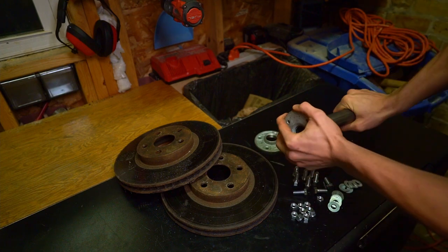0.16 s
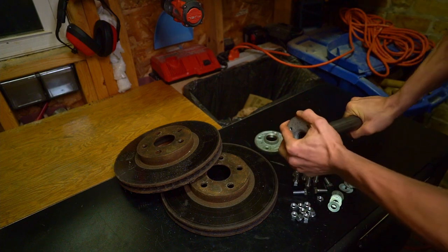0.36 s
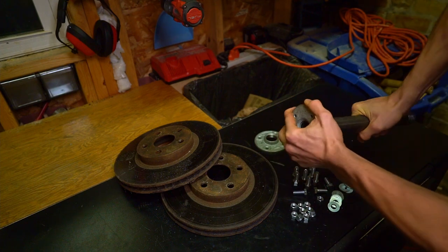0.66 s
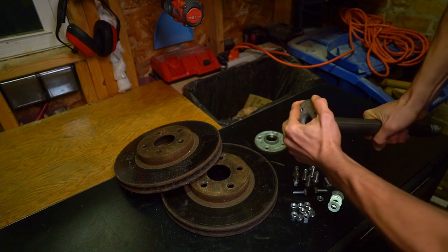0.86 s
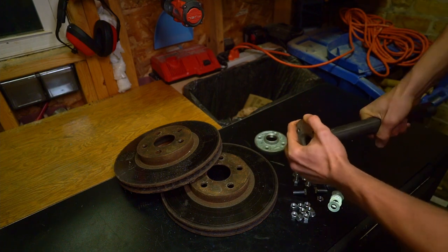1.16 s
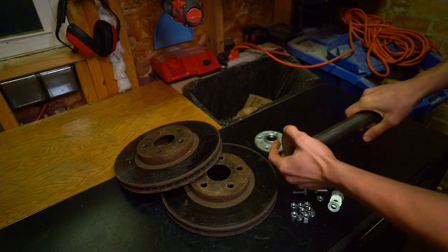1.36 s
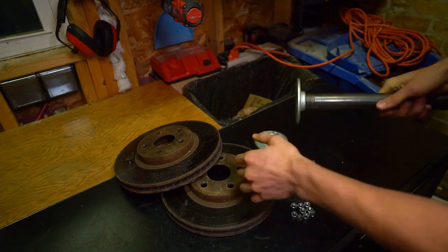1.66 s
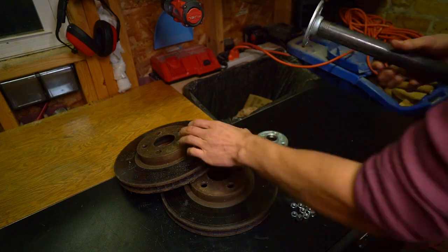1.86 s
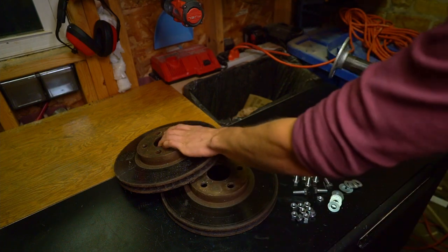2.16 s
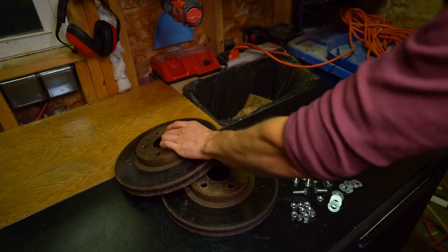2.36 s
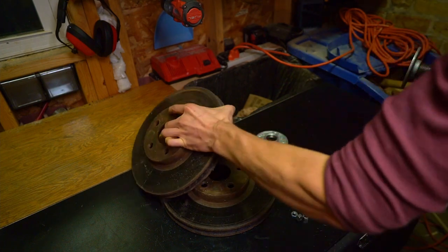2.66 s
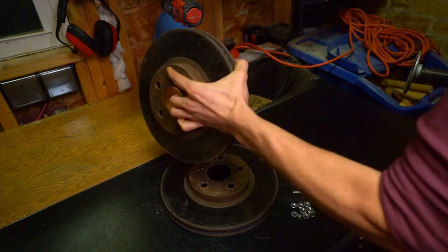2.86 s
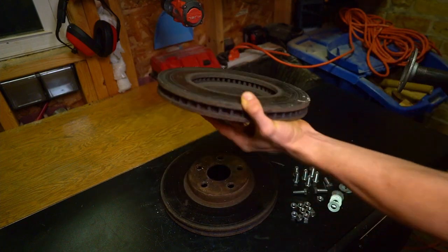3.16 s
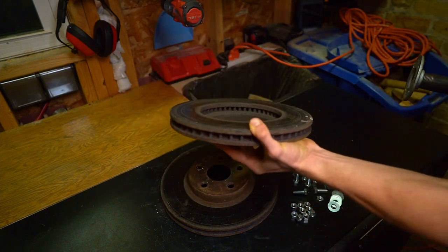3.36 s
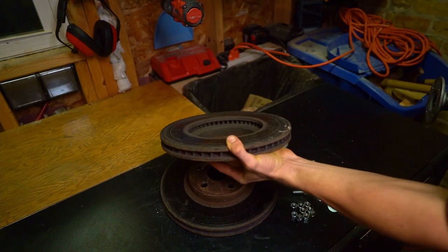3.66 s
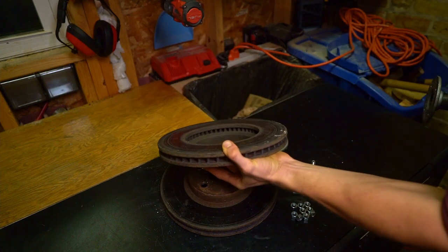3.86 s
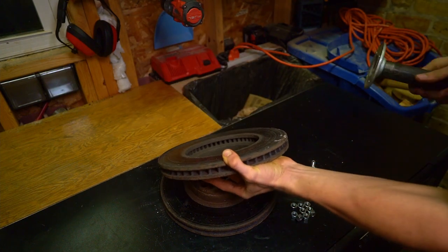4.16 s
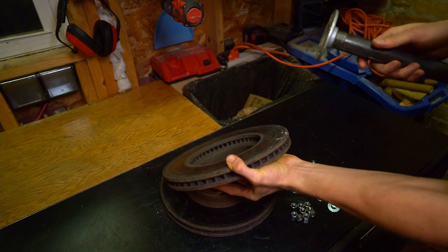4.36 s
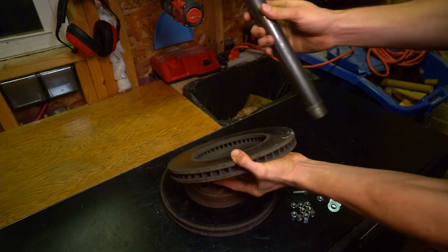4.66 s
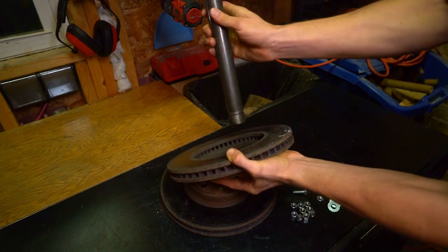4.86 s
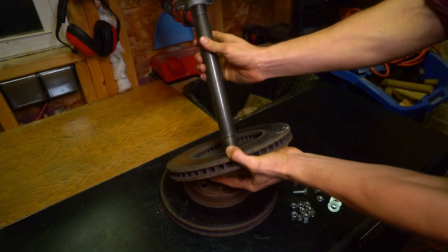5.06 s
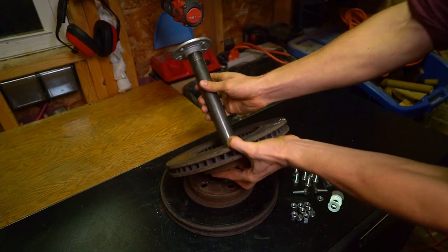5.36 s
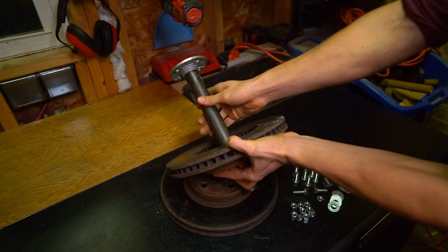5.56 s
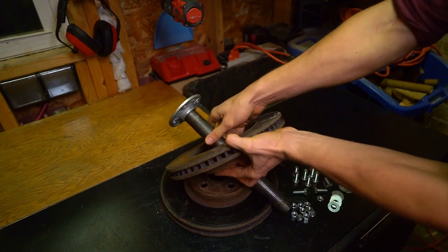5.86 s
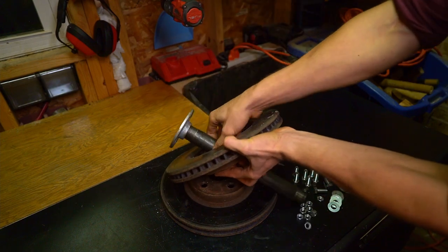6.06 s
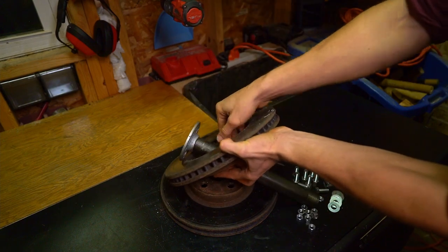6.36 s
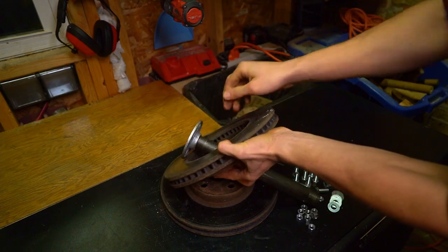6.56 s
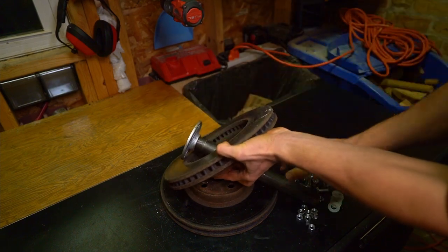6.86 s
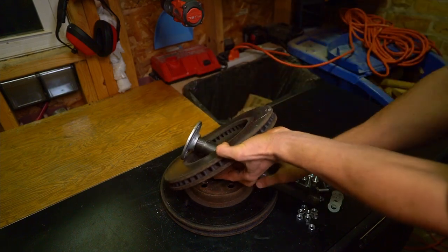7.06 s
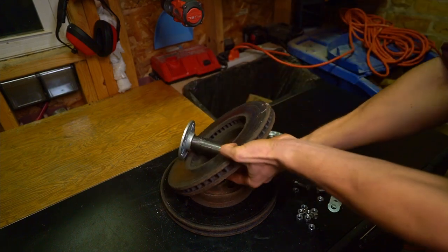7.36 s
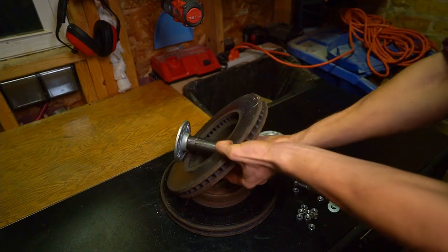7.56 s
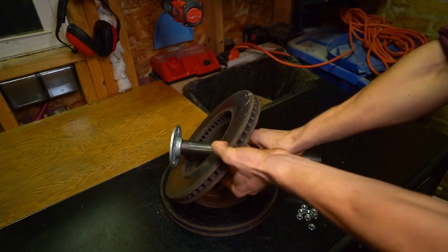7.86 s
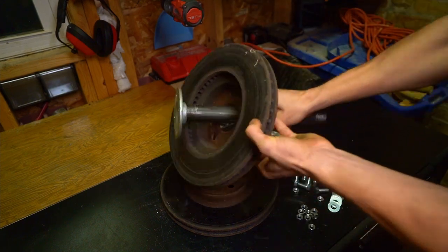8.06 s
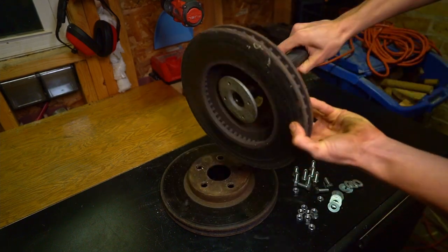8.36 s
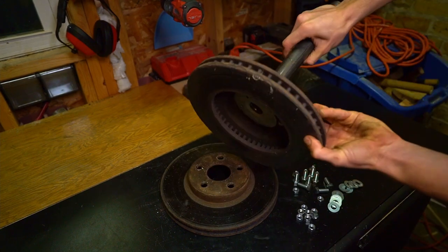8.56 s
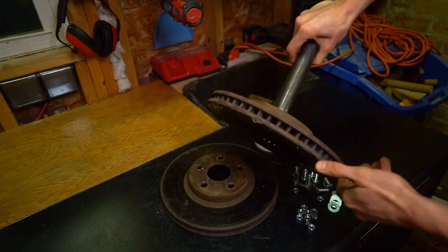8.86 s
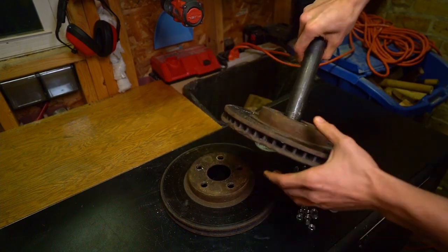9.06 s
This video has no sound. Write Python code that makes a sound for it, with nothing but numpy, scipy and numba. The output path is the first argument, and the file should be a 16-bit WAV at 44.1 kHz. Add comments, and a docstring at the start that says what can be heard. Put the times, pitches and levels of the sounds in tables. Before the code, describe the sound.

Heavy metal parts being fitted together, with ringing clanks, dull bench thuds and short squealing scrapes in a small workshop.

```python
"""A sleeve brushes past and grit ticks in a quiet, humming shed; then a cast brake rotor, a steel pipe
and its flange knock, slide and scrape together over a workbench. Each blow and rub is shared among the
parts, which ring in their own modes. Rubbing steel squeals, air sings in the rotor's hollow, the bench
thuds and rattles. The walls echo briefly; a small recorder squeezes and clips the loudest clanks."""
import sys
import numpy as np
from scipy import signal
from scipy.fft import rfft, irfft
from scipy.io import wavfile
from scipy.ndimage import uniform_filter1d
from numba import njit

SR = 44100
rng = np.random.default_rng(int(sys.argv[2]) if len(sys.argv) > 2 else 0)


def output_pcm(signal):
    """Save a mono or channel-first signal as 16-bit PCM at the path in sys.argv[1].

    Samples are clipped to [-1, 1] before scaling.
    """
    pcm = np.clip(np.atleast_2d(signal).T, -1, 1) * 32767
    wavfile.write(sys.argv[1], SR, np.round(pcm).astype(np.int16))


N = 406602
T = np.arange(N) / SR


def undb(db):
    return 10 ** (np.asarray(db) / 20)


def unit_rms(x):
    return x / np.sqrt(np.mean(x ** 2))


def band(x, hz, octaves):
    """Band-pass around hz, edges capped below Nyquist."""
    edges = np.minimum(hz * 2. ** (octaves * np.array([-.5, .5])), [SR / 2.4, SR / 2.2])
    return signal.sosfilt(signal.butter(2, edges, "bandpass", fs=SR, output="sos"), x)


def impulses(times_s, db):
    """One impulse per event."""
    return np.bincount((np.asarray(times_s) * SR).astype(int), undb(db), N)


def wander(rate_hz):
    """Ramps between random levels; spread near 1."""
    hold = int(SR / rate_hz)
    return 1.3 * uniform_filter1d(np.repeat(rng.standard_normal(N // hold + 1), hold), hold)[:N]


def grit(rate_hz, spread_db, spurt_db=4.0):
    """Micro-impacts of rough surfaces, uneven and in spurts."""
    size = undb(spread_db * np.minimum(rng.exponential(1, N), 5)) * rng.standard_normal(N)
    hits = rng.random(N) < rate_hz / SR
    return unit_rms(size * hits * undb(spurt_db * wander(40)))


def narrow_noise(hz, width_hz):
    """Narrow noise band around a steady or moving pitch."""
    lowpass = signal.butter(2, width_hz / 2, fs=SR, output="sos")
    slow = signal.sosfilt(lowpass, rng.standard_normal((2, N)))
    phase = 2 * np.pi * np.cumsum(hz * np.ones(N)) / SR
    return unit_rms(slow[0] * np.cos(phase) + slow[1] * np.sin(phase))


@njit
def mode(force, turn, loss, damping, rise):
    """One resonance: swells during contact, decays by loss * damping per sample."""
    out, push, state = np.empty(len(force)), 0j, 0j
    for i in range(len(force)):
        push = push * turn * (1 - rise) + rise * force[i]
        state = state * turn * (1 - loss * damping[i]) + push
        out[i] = state.imag
    return out


def ring(pitches_hz, modes, times_s, blow_db, rub=0, damping=1, spread_db=1.5, contact_s=0.0011):
    """A struck and rubbed part; each blow favours other modes at random."""
    mode_db, t60_s = np.transpose(modes)
    loss = np.log(1000) / SR / t60_s
    friction = rub * grit(rate_hz=5000, spread_db=3.0) * np.sqrt(4 * loss[0]) + 1e-18
    scatter_db = spread_db * rng.standard_normal((len(times_s), len(modes)))
    rise = 1 / (1 + contact_s * SR)
    out = np.zeros(N)
    for k, hz in enumerate(pitches_hz):
        force = impulses(times_s, blow_db + scatter_db[:, k]) + friction
        turn = np.exp(2j * np.pi * hz / SR)
        out += undb(mode_db[k]) * mode(force, turn, loss[k], damping * np.ones(N), rise)
    return out


def clatter(bands, times_s, blow_db, rub, octaves):
    """Dense modes as noise bands: they jump at a blow, decay, and are sustained by rubbing."""
    out = np.zeros(N)
    for hz, db, t60_s in bands:
        decay = np.exp(-np.log(1000) / (t60_s * SR))
        fade = signal.lfilter([1], [1, -decay], impulses(times_s, blow_db) + 1e-18)
        noise = band(grit(rate_hz=8000, spread_db=2.5), hz, octaves)
        out += undb(db) * unit_rms(band(noise, hz, 2 * octaves)) * (fade + rub)
    return out


# Room noise spectrum: f/Hz, relative density/dB
SHED_SPECTRUM = [(20, -2), (45, 5), (125, 7.5), (250, -1.5), (500, -5), (1000, -9.5), (2000, -20),
                 (3800, -22.5), (5500, -35.5), (16000, -36.5)]
# Hum partials: f/Hz, level/dB
SHED_HUM = [(96.9, -66), (360.7, -72.5)]


def shed(noise_db=-57.5):
    """Slightly wavering room noise with a faint hum."""
    spectrum_hz, spectrum_db = np.transpose(SHED_SPECTRUM)
    bins_hz = np.maximum(np.arange(N // 2 + 1) * SR / N, 1)
    shape = undb(np.interp(np.log(bins_hz), np.log(spectrum_hz), spectrum_db))
    noise = unit_rms(irfft(rfft(rng.standard_normal(N)) * shape, N))
    hum = sum(np.sqrt(2) * undb(db + 2 * wander(2.5)) * np.sin(2 * np.pi * hz * T) for hz, db in SHED_HUM)
    return undb(noise_db + 0.4 * wander(1.7)) * noise + hum


# Strokes of skin and sleeves: t/s, hold/s, high hiss/dB, low hiss/dB
STROKES = [(0.0, 0.039, -56, -57.5), (.45, 0.41, -98, -86), (1.29, 0.11, -60, -60.5),
           (1.5, 0.14, -77, -69.5), (1.8, 0.6, -73, -71), (2.66, 0.09, -51.5, -53),
           (3.33, 0.028, -81.5, -76), (4.6, 0.045, -80, -89), (5.47, 0.015, -52, -36.5),
           (7.03, .12, -69.5, -68.5), (7.28, .15, -60, -57), (7.66, 0.12, -69.5, -64),
           (8.46, 0.074, -61, -39)]
# High hiss bands: f/Hz, gain/dB
HISS_HIGH = [(6500, -2.5), (9000, 0), (12500, -3), (15200, -7)]
# Low hiss bands: f/Hz, gain/dB
HISS_LOW = [(2000, -3.5), (2900, -1.5), (3900, 3.5), (5000, -12)]


def brush(floor_db=-81.5, rise_s=0.02, fade_s=0.07):
    """Fine hiss of constant rustle, dust under slides, and strokes; rise and fade times per 20 dB."""
    slide_db = slides()[0]
    high = undb(floor_db) + undb(slide_db - 26.5)
    low = undb(floor_db) + undb(slide_db - 19)
    for start_s, hold_s, high_db, low_db in STROKES:
        fading = np.maximum(T - start_s - hold_s, 0) / fade_s
        stroke = undb(-20 * np.maximum(fading, (start_s - T) / rise_s))
        high += undb(high_db) * stroke
        low += undb(low_db) * stroke
    out = np.zeros(N)
    for envelope, bands in (high, HISS_HIGH), (low, HISS_LOW):
        for hz, db in bands:
            grains = grit(rate_hz=26000, spread_db=1.5, spurt_db=4.5)
            out += envelope * undb(db) * unit_rms(band(grains, hz, octaves=0.5))
    return out


# Grit and small hardware: t/s, peak level/dB, centre f/Hz
GRIT_TICKS = [(0.4336, -39.5, 2080), (0.495, -45, 2860), (0.5806, -53, 3280), (0.7084, -51, 1860),
              (0.862, -43, 4190), (0.9493, -47, 2880), (1.264, -40, 2960), (1.3, -34, 3480),
              (3.345, -43, 13900), (3.3694, -58, 3660), (3.4548, -58, 1700), (3.486, -30.5, 3200),
              (3.569, -50.5, 3210), (4.151, -36.5, 6800), (4.2653, -43.5, 2230), (4.3784, -47.5, 1466),
              (8.707, -60, 3028)]


def ticks(t60_s=0.011, octaves=1.52):
    """Dry snaps of grit and hardware: short band-passed noise bursts."""
    out, t = np.zeros(N), np.arange(2048) / SR
    for start_s, db, hz in GRIT_TICKS:
        burst = rng.standard_normal(len(t)) * 1000 ** (-t / t60_s)
        snap = band(band(burst, hz, octaves), hz, 2 * octaves)
        i = int(start_s * SR)
        out[i:i + len(t)] += undb(db) * snap / np.abs(snap).max()
    return out


# Air resonances, one path per gesture: t/s, lower f/Hz, level/dB, upper f/Hz, level/dB
AIR_GLIDES = [
    [(4.7, 509, -77, 1297, -67), (4.83, 542, -40, 1285, -47), (4.942, 510, -58.5, 1226, -77.5),
     (5.1, 533, -62, 1294, -66)],
    [(7.98, 596, -61, 1640, -66), (8.188, 589.5, -43, 1690, -42), (8.388, 900, -48.5, 1498, -44),
     (8.4, 820, -33.5, 1430, -40)],
]


def hollow(width_hz=110):
    """Air trapped in the rotor sings in two resonances that glide as the gap changes."""
    out = np.zeros(N)
    for path in AIR_GLIDES:
        times_s, *columns = np.transpose(path)
        for hz, db in columns[:2], columns[2:]:
            envelope = np.interp(T, times_s, undb(db), left=0, right=0)
            out += narrow_noise(np.interp(T, times_s, hz), width_hz) * envelope
    return out


# Friction squeals: start/s, end/s, f/Hz, width/Hz, level/dB
SQUEALS = [(0.6, 0.94, 7540, 220, -74.5), (1.95, 2.04, 9200, 97, -61), (1.4, 2.3, 9950, 80, -78),
           (2.015, 2.285, 3475, 18, -41), (15, 16, 4465, 16, -52.5), (6.21, 6.35, 6288, 22, -32),
           (6.2, 6.42, 4300, 25, -36), (8.01, 8.34, 3480, 14.3, -36), (8.29, 8.41, 4465, 20, -32)]


def squeals():
    """Rubbing steel locks onto one pitch, swells and fades."""
    out = np.zeros(N)
    for start_s, end_s, hz, width_hz, db in SQUEALS:
        arch = np.sqrt(np.maximum((T - start_s) * (end_s - T), 0)) * 2 / (end_s - start_s)
        out += undb(db) * narrow_noise(hz, width_hz) * arch
    return out


# Bench modes: f/Hz
BENCH_HZ = [97, 128, 163, 238, 258, 345, 404, 465, 494, 605, 757]
# Same modes: gain/dB, t60/s
BENCH_MODES = [(-11.5, 0.43), (-9, 0.28), (-11, 0.3), (-4.5, 0.13), (1, 0.29), (-2.5, 0.092), (-3.5, 0.029),
               (-3.5, 0.14), (-3, 0.19), (-9.5, 0.11), (-14.5, 0.1)]
# Soft heavy bumps: t/s, level/dB
BENCH_BUMPS = [(2.031, -31.5), (2.086, -64), (2.438, -18), (2.541, -28.5), (2.664, -14), (4.895, -21.5),
               (7.461, -20.5), (7.803, -36.5)]
# Boom bands: f/Hz, gain/dB, t60/s
BOOM_BANDS = [(162, -11, 0.057), (285, -7.5, 0.16), (562, -12, 0.19)]


def bench():
    """The bench thuds under blows and rumbles under slides; bumps shake only its deepest modes."""
    times_s, _, thud_db, _, _ = blows()
    rumble = undb(slides()[1])
    thuds = ring(BENCH_HZ, BENCH_MODES, times_s, thud_db, rumble, spread_db=3.0, contact_s=0.0018)
    bumps = ring(BENCH_HZ[:3], BENCH_MODES[:3], *np.transpose(BENCH_BUMPS), contact_s=0.006)
    boom = clatter(BOOM_BANDS, times_s, thud_db, rumble, octaves=0.97)
    return undb(-11.5) * thuds + bumps + boom


# Loose parts: f/Hz, gain/dB, t60/s
RATTLE_BANDS = [(1190, -1, 0.11), (1760, -6.5, 0.15), (2920, -8, 0.18), (3840, -25.5, 0.037)]


def rattle():
    """Loose parts rattle with each crack and, more, each thud; heavy slides make them grind."""
    times_s, crack_db, thud_db, _, _ = blows()
    slide_db, rumble_db, _, _ = slides()
    rattle_db = -3.5 + 0.4 * crack_db + 0.65 * thud_db
    grind_db = 15 + 1.69 * (slide_db + rumble_db) / 2
    return clatter(RATTLE_BANDS, times_s, rattle_db, undb(grind_db), octaves=1.0)


# Impact treble: f/Hz, gain/dB, t60/s
CRACK_BANDS = [(6500, -15.5, 0.027), (9190, -14.5, 0.0067), (12500, -33, 0.032), (16600, -17, 0.022)]


def cracks():
    """The brief bright edge of each blow."""
    times_s, crack_db, *_ = blows()
    return clatter(CRACK_BANDS, times_s, crack_db, rub=0, octaves=0.86)


# Steel sliding on steel, one path per slide: t/s, ring/dB, bench rumble/dB, spot (see PART_SPOTS)
SLIDE_PATHS = [
    [(2.01, -45.5, -58, 3.4), (2.286, -54.5, -54.5, 2.74), (2.33, -78, -61.5, 1.4)],
    [(2.4, -44, -43, 0.84), (2.58, -31.5, -19.5, 0.16), (2.64, -29, -26.5, 0.067)],
    [(4.5, -62, -45, 0.16), (4.596, -47, -47.5, 0.068), (4.774, -58, -47, 0.89), (4.882, -49, -39.5, 2.9),
     (5.216, -58.5, -60.5, 2.68), (5.4, -55, -41, 3.2)],
    [(5.4, -44, -46, 2.72), (5.61, -39.5, -46.5, 1.45), (5.956, -34, -38.5, 0.13), (6.19, -22.5, -15, 2.9),
     (6.402, -37.5, -23, 3.5), (6.55, -59, -43, 3.7)],
    [(7.2, -69, -45, 1.5), (7.37, -62, -30, .3), (7.498, -74.5, -61.5, 0.56), (7.74, -57.5, -43.5, 1.27),
     (7.98, -54.5, -54, 0.17)],
    [(7.98, -47, -46.5, 2.67), (8.204, -32, -45.5, 2.8), (8.37, -33.5, -55, 2.9), (8.4, -28.5, -42, 2.9),
     (8.43, -2, -30.5, 2.77), (8.46, -24.5, -34, 3.14)],
    [(8.73, -56, -58, 0.94), (8.786, -49.5, -58.5, 0.88), (8.9, -60.5, -63, 0.92)],
]


def slides():
    """Sliding contact per sample: ring level, rumble level, spot, 0/1 gate."""
    controls, sliding = np.full((3, N), -200.), np.zeros(N)
    for path in SLIDE_PATHS:
        times_s, *columns = np.transpose(path)
        active = (T >= times_s[0]) & (T < times_s[-1])
        controls[:, active] = [np.interp(T[active], times_s, column) for column in columns]
        sliding[active] = 1
    return *controls, sliding


# Steel knocking on steel: t/s, crack/dB, thud/dB, ring/dB, spot (see PART_SPOTS)
KNOCKS = [(2.0041, -27, -47, -37, 2.5), (2.4314, -47.5, -38, -41, 2), (2.4997, -36.5, -23, -24.5, 3),
          (2.6425, -49.5, -20.5, -20.5, 2), (2.6533, -17, -10.5, -11.5, 0.88),
          (2.901, -41, -53, -42.5, 0.5), (4.4134, -40, -4.5, -4.5, 0.15), (4.4461, -57, -22, -8.5, 0.85),
          (4.6574, -69, -38, -40, 1.5), (4.8876, -33, -82, -35, 3), (5.3538, -34, -61, -37.5, 3),
          (5.4219, -46, -43, -39, 9), (5.4672, -6.5, -2, -16.5, 1), (5.5462, -58, -26.5, -23.5, 3.4),
          (5.688, -11, -6.5, -6, 0.52), (5.7186, -25.5, -10.5, -11, 0.5), (5.7632, -30.5, -28.5, -21, 1.1),
          (5.8866, -31, -21, -13.5, 0.37), (5.9776, 6, -6.5, -11, 0), (6.0101, -12, -16.5, -39.5, -4),
          (6.0561, -14.5, -39.5, -14, 3), (6.119, -16, -6, -28.5, 5), (6.1747, -26.5, -17.5, -15.5, -1),
          (6.2025, -1, 1, -7, 5), (6.2747, -27, -10.5, -15.5, 5), (6.337, -13, -23, -26, 1),
          (6.3965, -55, -21, -36.5, 3), (6.4979, -72, -45.5, -31.5, 3.5), (6.587, -36.5, -15, -34.5, 1.8),
          (7.005, -64.5, -40, -62, 2.5), (7.229, -51.5, -16, -30.5, 1.6), (7.2747, -15.5, -11.5, 0, 2.9),
          (7.31, -51, -18.5, -19, 0.5), (7.449, -56.5, -27, -35, .5), (7.659, -48.5, -49.5, -46, 3),
          (7.7562, -65.5, -43, -43.5, 6), (7.9624, -35, -40, -41, 2.5), (8.404, -9, -19.5, -12.5, 2.5),
          (8.4282, 0.5, -52, -13.5, 2), (8.446, -49, -50, -29, 1), (8.4647, -7, -46.5, -18, 2.5),
          (8.4992, -51, -35.5, -36, 8.5), (8.6267, -33, -34, -37, 1.5), (8.6402, -43, -50, -39.5, 5),
          (8.749, -43, -53, -44, 0.7), (8.8731, -35, -64.5, -51, 0.5), (9.18, -36, -37.5, -38, 3)]


def blows():
    """The knocks as columns; they drive bench, rattle, cracks and steel."""
    return np.transpose(KNOCKS)


# Rim, face, vanes, hat, flange along the contact path: spot/steps
PART_SPOTS = [0, 1, 2, 2.999, 4.598]


def part_levels_db(times_s, db, spot, fall_db_per_step, pipe_in_s=5.3):
    """Drive falls with distance from the contact; the flange joins once the pipe sits in the bore."""
    share_db = -fall_db_per_step * np.abs(spot - np.array(PART_SPOTS)[:, None])
    rotor_db = np.maximum(share_db[:-1], -22)  # one casting: every part takes a share
    flange_db = np.where(times_s > pipe_in_s, share_db[-1:], -200)
    return db + np.concatenate([rotor_db, flange_db])


# Rotor rim modes: f/Hz; then gain/dB, free t60/s
RIM_HZ = [1168, 1215, 1240, 1394]
RIM_MODES = [(-6.5, 0.76), (0, 0.16), (0, 0.093), (-3.5, 0.056)]
# Rotor face modes: f/Hz; then gain/dB, free t60/s
FACE_HZ = [3045, 2662, 3515, 4285, 4510, 5955, 6185, 7360, 7630, 9345, 9795, 11100, 12300]
FACE_MODES = [(0, 0.18), (0.5, 0.19), (-7.5, 0.23), (-6.5, 0.15), (-20, 0.26), (-25.5, 0.071),
              (-21.5, 0.025), (-25, 0.19), (-22.5, .15), (-24, 0.084), (-28, 0.027), (-35.5, 0.04),
              (-33, .1)]
# Rotor vane modes: f/Hz; then gain/dB, free t60/s
VANE_HZ = [2925, 2505, 2400, 5085, 1520]
VANE_MODES = [(3.5, .17), (3.2, 0.18), (-9.5, 0.25), (-23.5, 0.41), (-17.5, 0.54)]
# Rotor hat (raised centre) modes: f/Hz; then gain/dB, free t60/s
HAT_HZ = [3475, 2985, 4465, 6770, 6830, 7765, 8270, 9320, 9890, 10330, 12100, 14280]
HAT_MODES = [(2.5, 0.08), (-13, 0.29), (1.5, 0.025), (-19, 0.16), (-19.5, 0.056), (-17.5, 0.076),
             (-25.5, .1), (-25.5, 0.051), (-30, .08), (-24.5, 0.092), (-31, .08), (-31.5, .1)]
# Flange modes: f/Hz; then gain/dB, free t60/s
FLANGE_HZ = [6288, 1513, 2638, 3345, 3494, 10210, 10280, 15300]
FLANGE_MODES = [(3, 0.09), (5, 0.15), (8, 0.058), (6, 0.28), (11.5, 0.053), (-7.5, 0.05), (-5.5, 0.099),
                (-14.5, .15)]
# Pipe wall modes: f/Hz; then gain/dB, free t60/s
PIPE_HZ = [7953, 8027, 4680, 9910, 11000, 12200, 9150, 13800]
PIPE_MODES = [(-0.5, 0.36), (-1.5, 0.19), (-5.5, 0.51), (-13, 0.18), (-12.5, 0.16), (-18, .2), (-23, .2),
              (-29, .15)]
# Jolts of the loose flange: t/s, level/dB
FLANGE_JOLTS = [(1.335, -62.5), (1.4704, -65), (1.5382, -66), (1.5803, -62), (1.5993, -49), (5.4213, -47.5),
                (6.357, -38), (7.233, -35), (7.275, -25.5)]
# Blows on the pipe wall: t/s, level/dB
PIPE_KNOCKS = [(4.4134, -47.5), (5.468, -51.5), (5.6884, -24), (5.7644, -24.5), (5.8874, -34),
               (5.9773, -19), (6.0544, -31.5), (6.121, -12), (6.1744, -26.5), (6.2014, -19.5),
               (6.3574, -38.5), (7.2744, -42.5), (8.4282, -33)]
# A hand closes on the rotor: start/s, end/s, damping factor
HAND_GRIPS = [(2.288, 2.4, 2.4), (4.453, 4.705, 1.76), (8.624, 8.74, 1.7)]


def steel():
    """Rotor, flange and pipe ring under blows and rubs; sliding contact or a hand shortens the ring."""
    times_s, crack_db, _, ring_db, blow_spot = blows()
    slide_db, _, slide_spot, sliding = slides()
    blows_db = part_levels_db(times_s, ring_db, blow_spot, fall_db_per_step=19.5)
    rubs = sliding * undb(part_levels_db(T, slide_db, slide_spot, fall_db_per_step=12.5))
    damping = np.where(sliding, 1.38, 1.0)
    for start_s, end_s, factor in HAND_GRIPS:
        damping[(T > start_s) & (T < end_s)] = factor
    parts = [(RIM_HZ, RIM_MODES), (FACE_HZ, FACE_MODES), (VANE_HZ, VANE_MODES),
             (HAT_HZ, HAT_MODES), (FLANGE_HZ, FLANGE_MODES)]
    clanks = sum(ring(*part, times_s, db, rub, damping) for part, db, rub in zip(parts, blows_db, rubs))
    tinks = ring(FLANGE_HZ, FLANGE_MODES, *np.transpose(FLANGE_JOLTS), damping=damping)
    pipe = ring(PIPE_HZ, PIPE_MODES, *np.transpose(PIPE_KNOCKS), damping=damping)
    # Sharp cracks and fine grit wake the rotor's top modes.
    top_hz, top_modes = HAT_HZ[3:] + FACE_HZ[5:], HAT_MODES[3:] + FACE_MODES[5:]
    overtones = ring(top_hz, top_modes, times_s, crack_db - 15, undb(slide_db - 9), damping, spread_db=4.0)
    return clanks + tinks + pipe + overtones


def echo(direct, t60_s=0.25, gap_s=0.004, top_hz=4400):
    """Walls and shelves reflect; wood and clutter absorb the treble."""
    t = np.arange(SR // 2) / SR
    tail = rng.standard_normal(len(t)) * 1000 ** (-t / t60_s) * (t > gap_s)
    tail = signal.sosfilt(signal.butter(1, top_hz, fs=SR, output="sos"), tail)
    return signal.fftconvolve(direct, tail / np.sqrt(np.sum(tail ** 2)))[:N]


def scene(bass_cut_hz=41):
    """Mono mix of the work at the bench, its echo and the shed."""
    # Cuts rumble and DC offset from the knocks and scrapes.
    highpass = signal.butter(3, bass_cut_hz, "highpass", fs=SR, output="sos")
    contacts = signal.sosfilt(highpass, steel() + bench() + rattle() + cracks())
    direct = contacts + brush() + ticks() + hollow() + squeals()
    return (direct + undb(-10.5) * echo(direct) + shed())[None]


@njit
def follow_peaks(x, attack_s, release_s):
    """Level detector with separate rise and fall times."""
    out, level = np.empty(len(x)), 0.
    for i in range(len(x)):
        size = abs(x[i])
        level += (size - level) / (SR * (attack_s if size > level else release_s))
        out[i] = level
    return out


def record(dry, threshold_db=-9, ratio=2.2, top_hz=15900):
    """The compressor reacts late, so a loud clank's first swings clip; a steep low-pass follows."""
    level = follow_peaks(dry[0], attack_s=0.0022, release_s=0.047)
    gain = np.minimum(1, undb(threshold_db) / (level + 1e-9)) ** (1 - 1 / ratio)
    lowpass = signal.ellip(12, .2, 75, top_hz, fs=SR, output="sos")
    return signal.sosfilt(lowpass, np.clip(dry * gain, -1, 1))


dry = scene()
out = record(dry)
output_pcm(out)
```